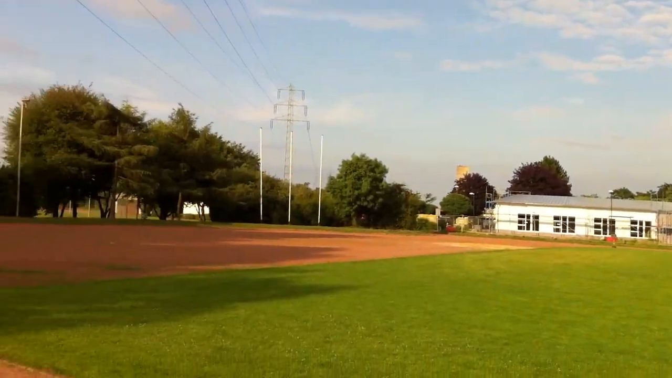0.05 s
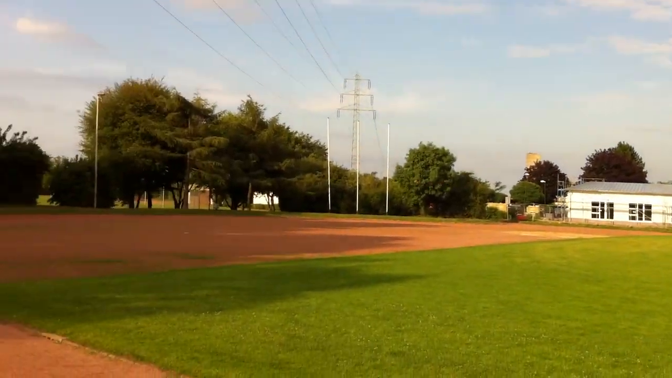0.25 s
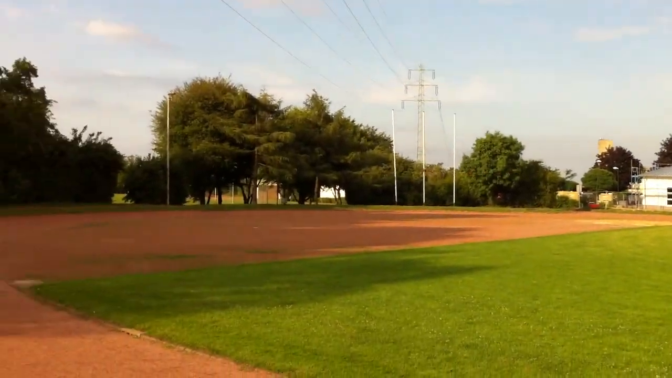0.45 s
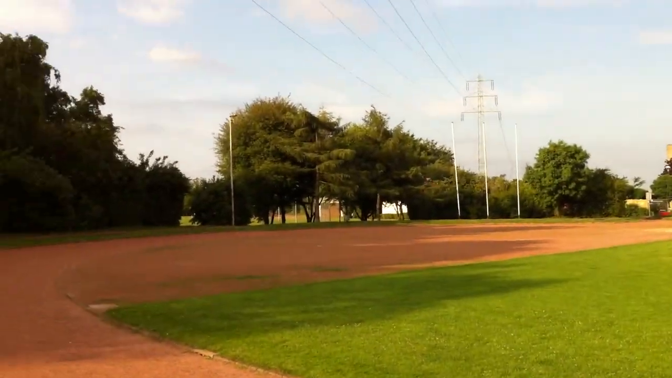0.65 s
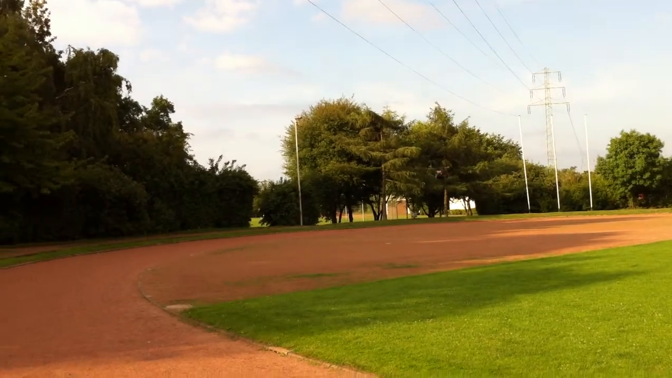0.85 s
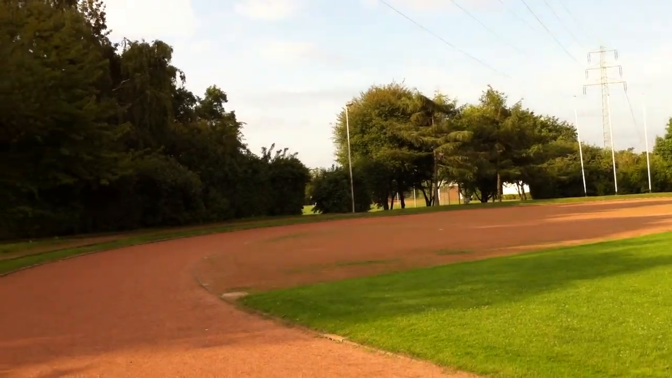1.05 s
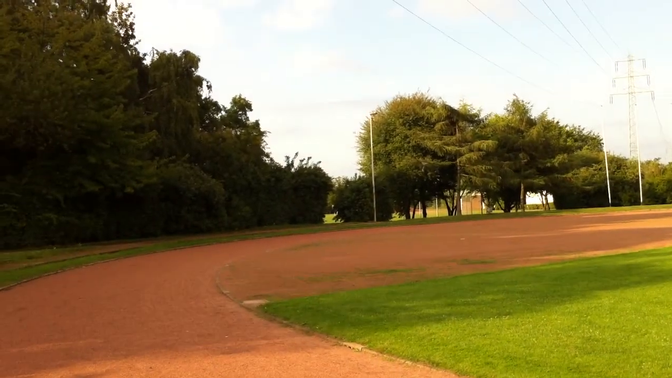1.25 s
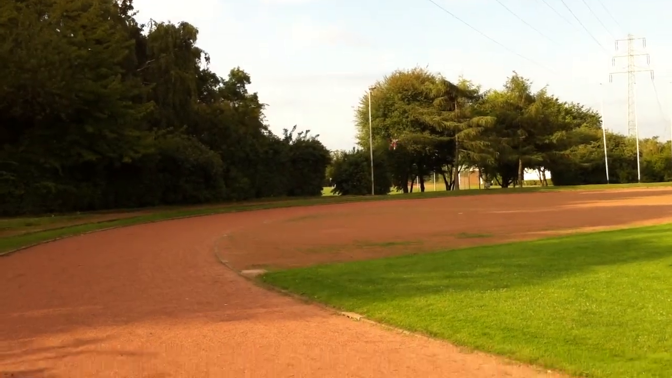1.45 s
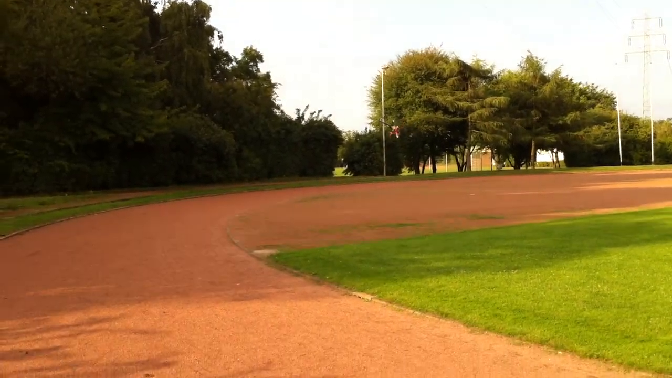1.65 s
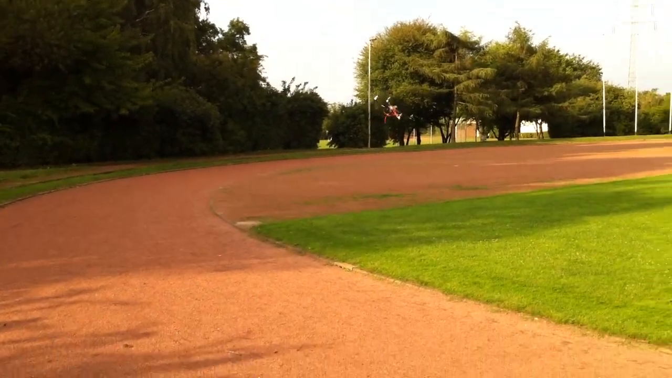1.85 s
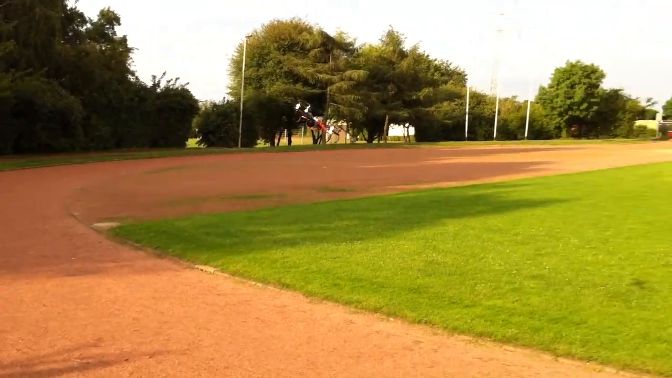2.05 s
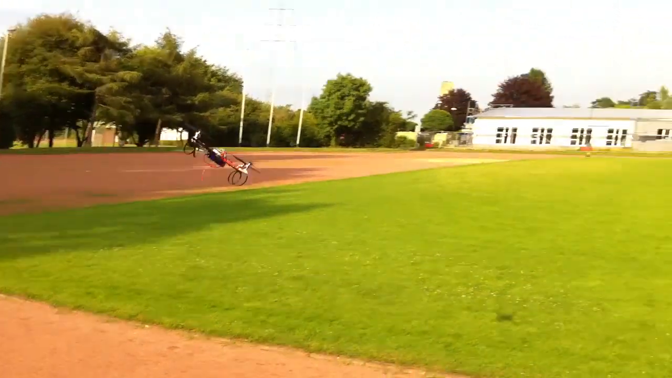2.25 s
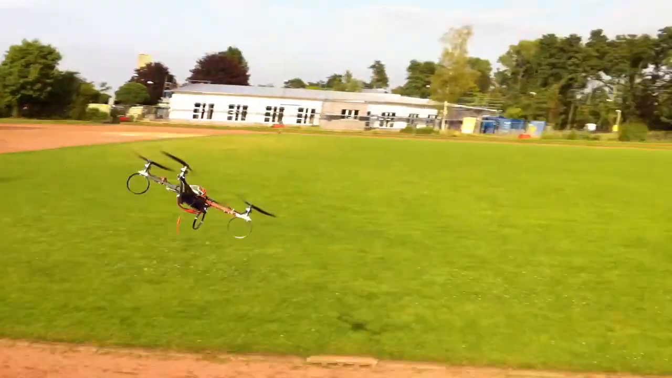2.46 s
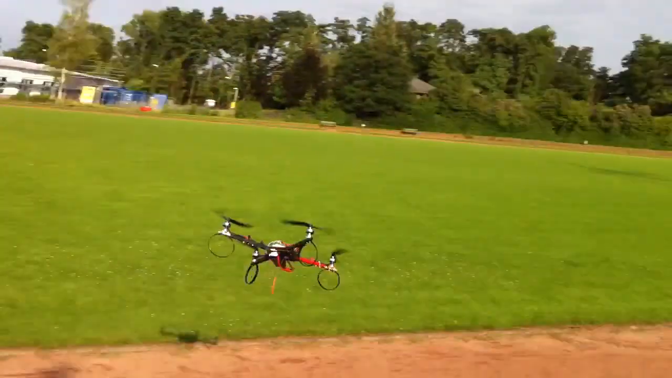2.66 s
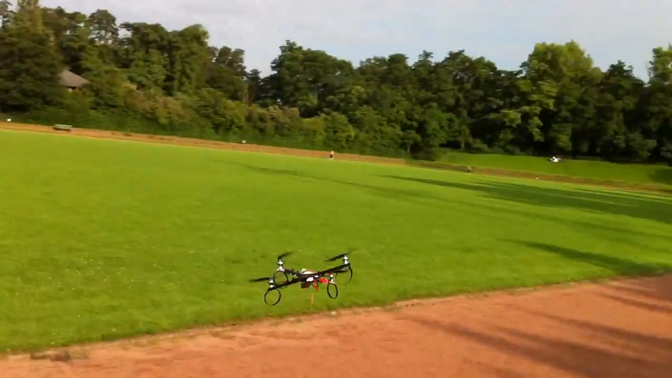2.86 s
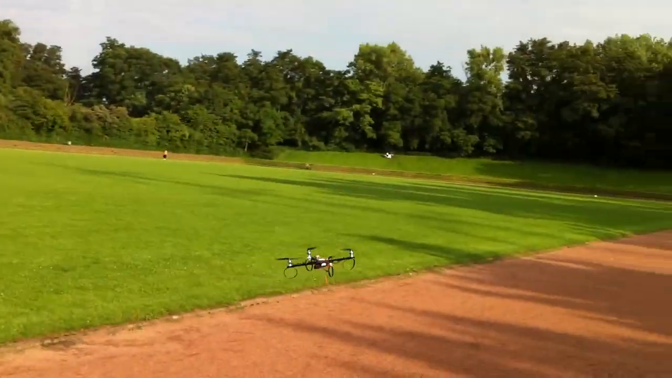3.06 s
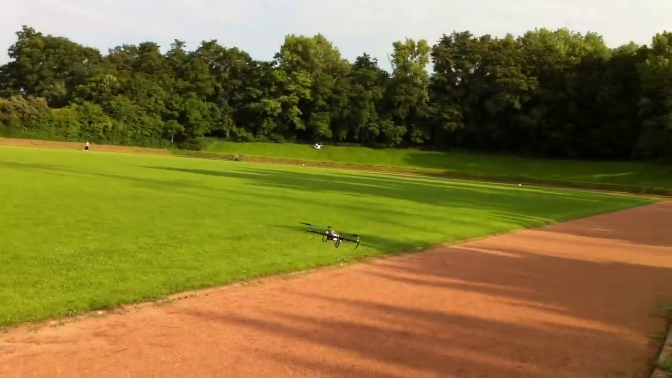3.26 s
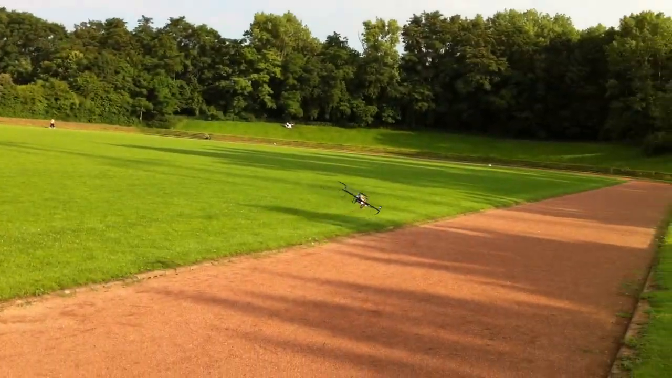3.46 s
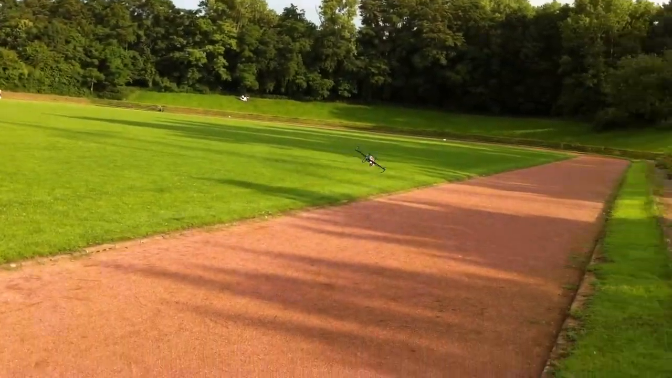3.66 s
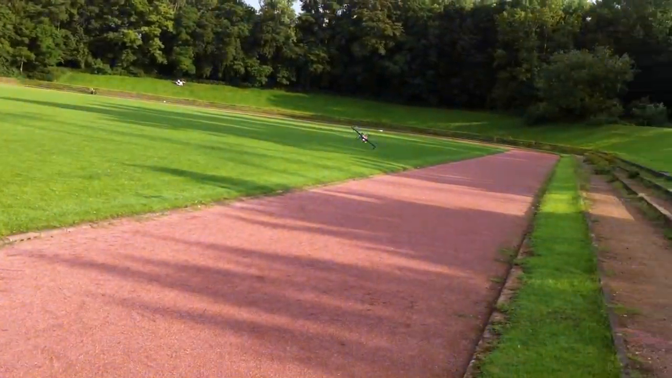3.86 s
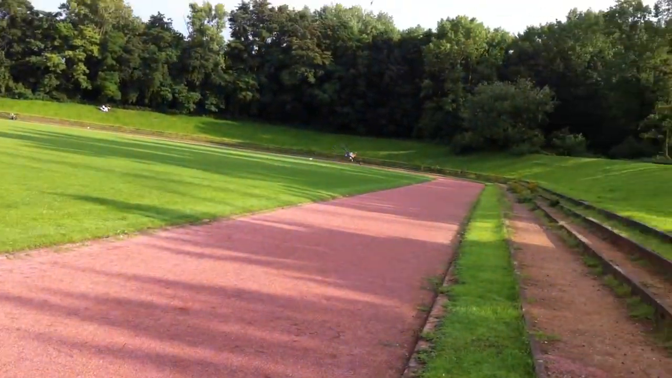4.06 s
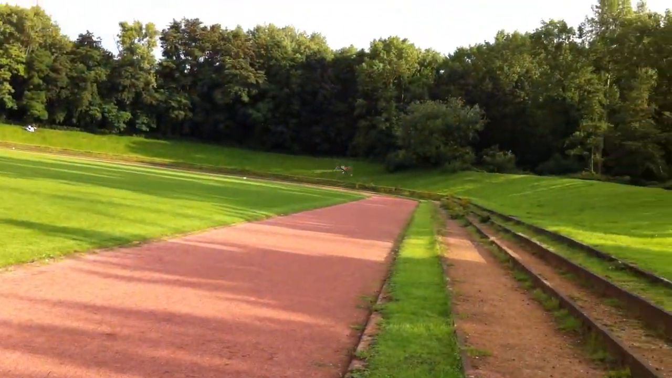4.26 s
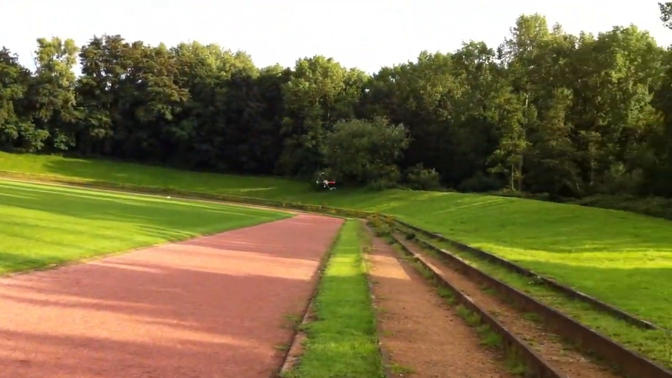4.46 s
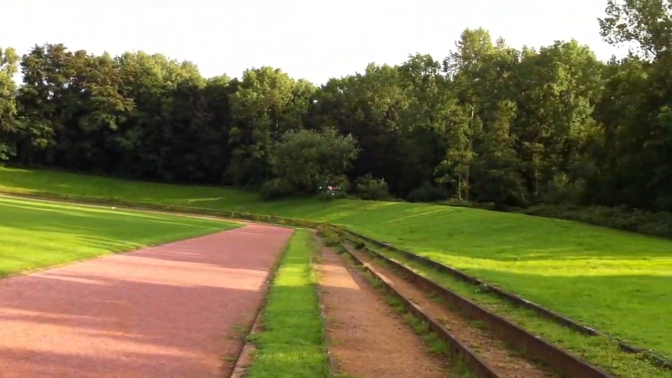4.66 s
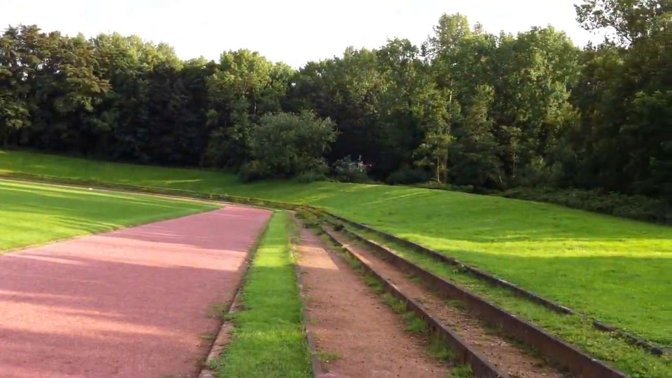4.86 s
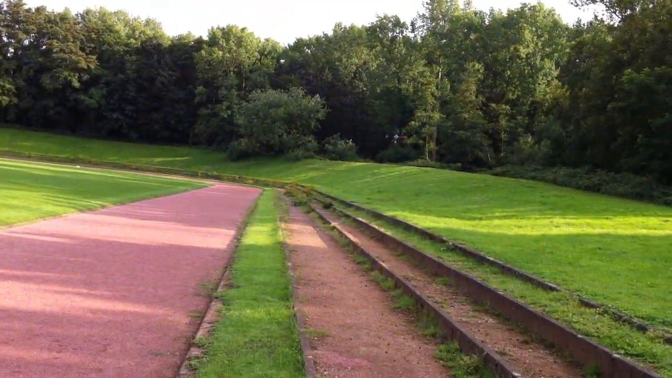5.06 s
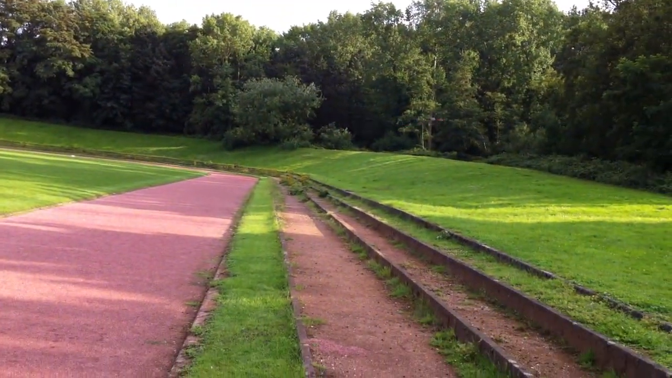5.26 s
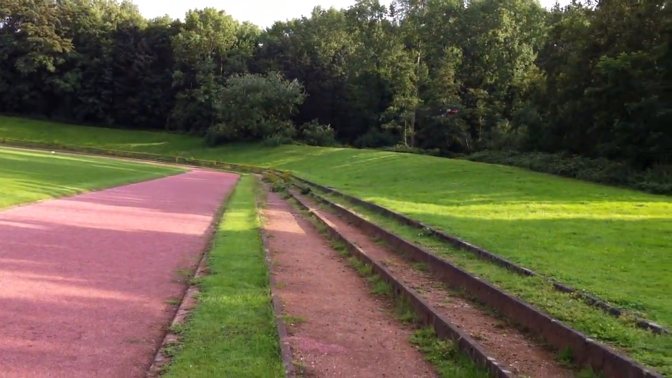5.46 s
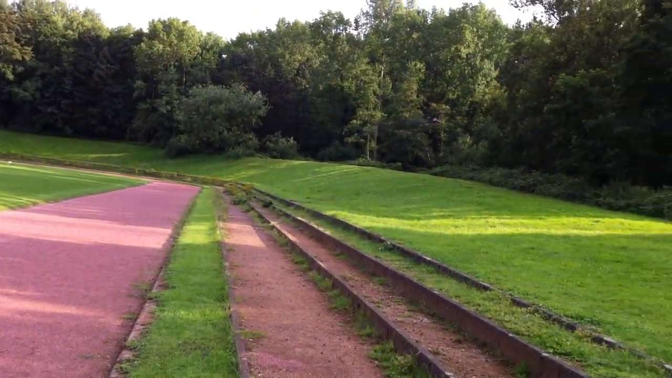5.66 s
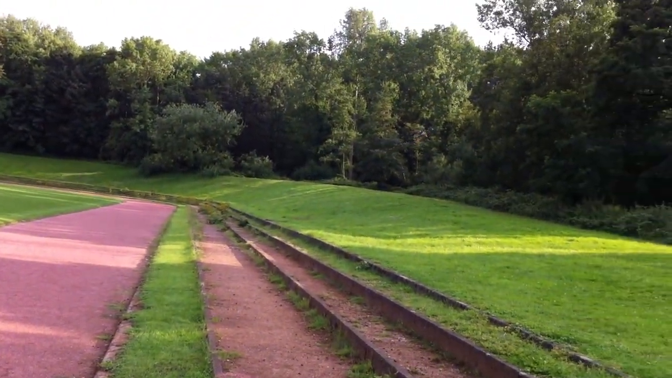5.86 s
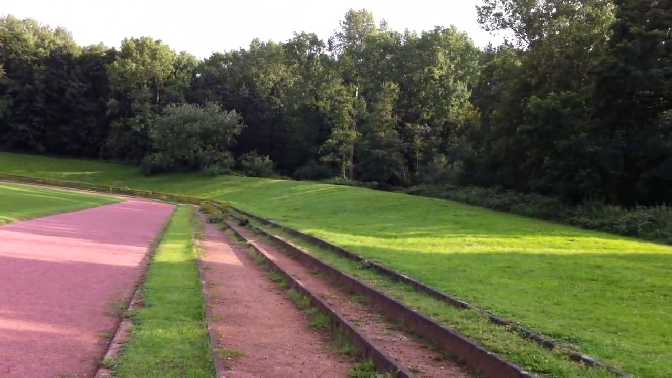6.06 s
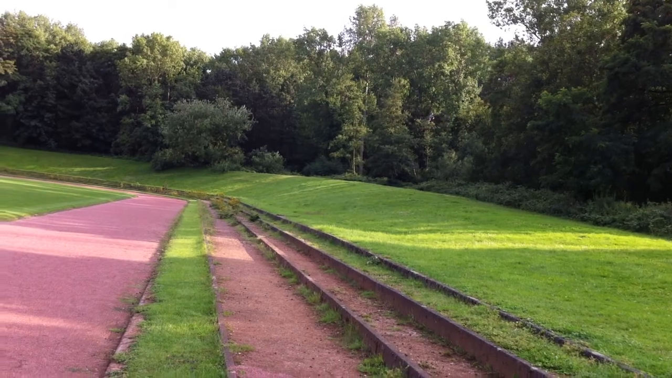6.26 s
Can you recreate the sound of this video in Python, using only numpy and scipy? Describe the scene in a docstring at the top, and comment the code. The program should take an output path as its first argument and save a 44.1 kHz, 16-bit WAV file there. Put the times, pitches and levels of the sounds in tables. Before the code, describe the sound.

Outdoors on an open sports field, a small electric drone is first a faint, restless whine with thin hiss. A bird gives a few short whistles as it approaches. It sweeps close with fluttering blade hum, bright hiss and several clashing motor whines, loudest before the middle, then recedes quickly. Soft wind bumps touch the small handheld microphone while the whine thins away over quiet distant rumble.

```python
"""Far whines and hum of a small four-rotor drone over a sports field; it comes close, passes and fades.
Each motor whines on a high multiple of its restless shaft speed; blades hum in sines and hiss in shaped
noise. The speed controllers sing near 8 kHz, bent by Doppler. A bird whistles in short glides, low wind
pulses and a gust bump the microphone; shaped field noise and a steady thin tone lie beneath."""
import sys
import numpy as np
from scipy import signal
from scipy.io import wavfile
from scipy.ndimage import uniform_filter1d

SR = 44100
rng = np.random.default_rng(int(sys.argv[2]) if len(sys.argv) > 2 else 0)


def unload_audio(sound):
    """Save the sound as a 16-bit wav file, at the path given as the first command line argument."""
    columns = np.transpose(np.atleast_2d(sound))
    # keep every value between -1 and 1, then stretch to whole-number steps
    steps = np.round(np.clip(columns, -1, 1) * 32767)
    wavfile.write(sys.argv[1], SR, steps.astype(np.int16))


N = 278712


def gain_of(db):
    """Decibels to gain."""
    return 10 ** (np.asarray(db) / 20)


def evened(x):
    """Scales to rms 1."""
    return x / np.sqrt(np.mean(x ** 2) + 1e-20)


def read(points, hz):
    """Reads a spectrum on a log frequency axis."""
    f, value = np.transpose(points)
    return np.interp(np.log(hz + 1), np.log(f + 1), value)


def curves(rows, t):
    """Reads every column at the times t."""
    s, *columns = np.transpose(rows)
    return [np.interp(t, s, c) for c in columns]


def step(t, s, width_s):
    """Goes smoothly from 0 to 1 around s seconds."""
    return .5 + .5 * np.tanh((t - s) / width_s)


def add(mix, s, sound):
    """Mixes a sound in at s seconds."""
    part = mix[round(s * SR):][:len(sound)]
    part += sound[:len(part)]


def drift(top_hz):
    """Slow random curve of rms 1: lowpassed noise at a low rate, interpolated."""
    lowpass = signal.butter(2, top_hz, fs=SR / 64, output="sos")
    steps = signal.sosfilt(lowpass, rng.standard_normal(N // 32))
    settled = steps[-(N // 64):]
    return evened(np.interp(np.arange(N) / 64, np.arange(N // 64), settled))


def tone(hz, db):
    """A sine of rms level db that follows the curve hz from a random phase."""
    cycles = np.cumsum(hz) / SR + rng.random()
    return np.sqrt(2) * gain_of(db) * np.sin(2 * np.pi * cycles)


def noise(level_db, patchy_db):
    """Random short-time spectra; level_db(hz, t) shapes them, with drifting patches."""
    frames, hz = N // 256 + 5, np.fft.rfftfreq(1024, 1 / SR)
    real, imag, patches = rng.standard_normal((frames, 513, 3)).T
    patches = uniform_filter1d(patches, size=16, axis=0)
    patches = evened(uniform_filter1d(patches, size=14, axis=1))
    shape_db = level_db(hz[:, None], np.arange(frames) * 256 / SR)
    spectra = (real + 1j * imag) * gain_of(shape_db + patchy_db * patches)
    return signal.istft(spectra, nperseg=1024, noverlap=768)[1][:N]


# Distant traffic and leaves. Each row: frequency in Hz, relative density in dB per Hz.
FIELD_SPECTRUM = [(18, -47), (59, -42), (151, -2.5), (250, -7.5), (389, -12), (1060, -6.5), (1780, -11.5),
                  (3000, -18.5), (3900, -74), (6600, -120)]
# Later colour of the field. Each row: frequency in Hz, change in dB.
FIELD_LATER = [(100, 5), (180, 0.5), (300, -2), (650, -5), (1050, 3.5), (1800, 1), (2600, -14.5)]
FIELD_RMS_DB, COLOUR_SHIFT_S, COLOUR_WIDTH_S = -60, 4.2, 0.68


def field():
    """Distant traffic and leaves as shaped noise whose colour shifts once."""
    def level_db(hz, t):
        shift = step(t, COLOUR_SHIFT_S, COLOUR_WIDTH_S)
        return read(FIELD_SPECTRUM, hz) + read(FIELD_LATER, hz) * shift
    return gain_of(FIELD_RMS_DB) * evened(noise(level_db, patchy_db=1.0))


# Steady high tone. Each row: frequency in Hz, rms level in dB.
THIN_TONES = [(15000, -76)]


def thin_tone():
    """A faint high sine of constant pitch and level."""
    return sum(tone(np.full(N, hz), db) for hz, db in THIN_TONES)


GUST_FROM_S, GUST_TO_S, GUST_DB, GUST_TOP_HZ = 3.5, 5.35, -66, 89


def wind_gust(t):
    """A gust on the microphone: lowpassed noise of lumpy level."""
    lowpass = signal.butter(2, GUST_TOP_HZ, fs=SR, output="sos")
    low = evened(signal.sosfilt(lowpass, rng.standard_normal(N)))
    gate = step(t, GUST_FROM_S, 0.21) - step(t, GUST_TO_S, 0.33)
    return low * gain_of(GUST_DB + 1.9 * drift(6.7)) * gate


# Wind bumps. Each row: start in seconds, relative level in dB, initial pitch in Hz.
WIND_BUMPS = [(3.749, -34, 180), (3.826, -40.5, 170), (4.088, -38, 172), (4.112, -40, 155),
              (4.139, -43, 163), (4.176, -39.5, 125), (4.199, -39, 197), (4.711, -41.5, 152),
              (5.55, -47.5, 123)]


def wind_bumps():
    """Each bump on the microphone is a low push of about two cycles that sags in pitch."""
    out = np.zeros(N)
    for s, db, hz in WIND_BUMPS:
        u = np.arange(2600) / SR * hz  # cycles at the initial pitch
        envelope = u / 0.82 * np.exp(-u / 0.5)
        add(out, s, gain_of(db + 11.5) * envelope * np.sin(2 * np.pi * u / (1 + 0.039 * u)))
    return out


# Bird notes. Each row: start in seconds, length in seconds, start, middle and end pitch in Hz,
# rms level in dB before the rounded envelope.
BIRD_NOTES = [(1.47, .11, 1830, 2030, 1740, -62), (1.86, .15, 2180, 2220, 2270, -64),
              (1.93, .045, 2100, 1850, 1650, -61), (2.155, .05, 1780, 1800, 1820, -61),
              (2.22, .03, 2050, 1900, 1700, -65), (2.26, .04, 1750, 1740, 1750, -62)]


def bird():
    """Short whistles, each gliding along a parabola through three pitches."""
    out = np.zeros(N)
    for s, length_s, *hz, db in BIRD_NOTES:
        u = np.linspace(0, 1, round(length_s * SR))
        glide_hz = np.polyval(np.polyfit([0, .5, 1], hz, 2), u)
        add(out, s, tone(glide_hz, db) * np.sin(np.pi * u) ** 0.26)
    return out


# One table a rotor. Each row: time in seconds, shaft speed as heard in rev/s.
ROTOR_SPEEDS = [
    [(0, 71.9), (.12, 75.3), (.21, 71.6), (.3, 70.2), (.43, 71), (.52, 69.7), (.63, 71), (.73, 68.1),
     (.89, 67.3), (.98, 69), (1.1, 68.3), (1.17, 70.2), (1.27, 66.7), (1.35, 72), (1.47, 69), (1.59, 68.4),
     (1.78, 71.9), (1.87, 77), (1.94, 80), (2.055, 72.6), (2.15, 73.6), (2.28, 66.5), (2.45, 66),
     (2.62, 66.2), (2.7, 70.4), (2.8, 71.5), (2.89, 74.5), (2.96, 79.8), (3, 78.3), (3.06, 74.1),
     (3.15, 79.2), (3.23, 75.8), (3.31, 82.4), (3.36, 81.2), (3.44, 75.6), (3.55, 73.6), (3.64, 78.2),
     (3.76, 80.8), (3.93, 77.4), (4.08, 72), (4.15, 75.8), (4.32, 70.4), (4.42, 75.5), (5.11, 70.6),
     (5.18, 67.6), (5.25, 69.9), (5.35, 65.7), (5.46, 67.6), (5.58, 62.7), (5.72, 67.4), (5.83, 69.8),
     (5.91, 69.5), (5.97, 73.5), (6.08, 73.6), (6.24, 68.3), (6.32, 73.7)],
    [(0, 85.5), (.08, 86), (.26, 92.3), (.56, 90.1), (.63, 84.5), (.8, 82.5), (.97, 83), (1.1, 80),
     (1.24, 85), (1.36, 80), (1.48, 81.5), (1.56, 79.1), (1.71, 79.4), (1.77, 82.3), (1.96, 81.8),
     (2.04, 86.8), (2.18, 75.3), (2.24, 75), (2.32, 71.8), (2.46, 72.6), (2.58, 71), (2.62, 73.8),
     (2.65, 72.8), (2.72, 74.6), (2.8, 72), (2.85, 70.3), (2.89, 68.3), (2.92, 72), (2.98, 69.4),
     (3.03, 70.9), (3.08, 70), (3.26, 58.3), (3.39, 56.8), (3.48, 62.5), (3.57, 66.7), (3.62, 68.2),
     (3.7, 66), (3.79, 67.8), (3.86, 65.8), (3.93, 70), (4.39, 58), (4.46, 62), (4.52, 59.4), (4.6, 55.6),
     (4.67, 63.7), (4.74, 66.8), (4.83, 71.6), (5.68, 60.5), (6.32, 66)],
    [(0, 72.3), (.54, 71.5), (1.4, 67), (1.58, 67.9), (1.68, 65), (1.8, 72), (1.86, 68.9), (2.1, 70),
     (2.2, 66), (2.5, 66), (2.7, 73), (2.95, 71), (3.05, 66), (3.165, 62), (3.2, 66), (3.24, 73),
     (3.27, 74.3), (3.34, 71), (3.41, 73.8), (3.52, 70.9), (3.63, 77.9), (3.7, 79.2), (3.79, 81.6),
     (3.87, 86.2), (3.91, 84.3), (3.99, 86.7), (4.04, 84.4), (4.18, 80.5), (4.28, 83.5), (4.66, 83.9),
     (4.95, 79.4), (5.13, 81.6), (5.27, 80.2), (5.37, 82.4), (5.54, 78.9), (5.79, 83.1), (5.89, 79.6),
     (5.96, 85.1), (6.11, 87.1), (6.21, 81.3), (6.32, 84.2)],
    [(0, 79), (.52, 82.7), (.64, 78), (1.8, 80), (1.98, 85.3), (2.04, 85.8), (2.26, 78.2), (2.48, 77),
     (2.56, 84), (2.7, 88.8), (3.06, 85.2), (3.29, 73.9), (3.42, 76), (3.52, 82), (3.7, 84.3), (3.77, 82),
     (3.97, 79), (4.12, 77.8), (4.24, 79), (4.34, 82), (4.43, 77.9), (4.53, 84.2), (4.68, 83.8),
     (4.8, 78.2), (5.08, 80.6), (5.23, 75.3), (5.5, 77.2), (5.57, 79), (5.72, 77.6), (5.8, 75.3),
     (5.9, 77.1), (6.06, 70.9), (6.2, 78), (6.32, 74.2)],
]


def shaft_speeds(t):
    """Shaft speeds in rev/s; inertia rounds the changes."""
    return [uniform_filter1d(curves(rows, t)[0], size=1100) for rows in ROTOR_SPEEDS]


def blurred(speed):
    """The blade tones blur the quickest wobbles of the shaft."""
    return uniform_filter1d(speed, size=4000)


def blade_beat(speeds):
    """The beat of all blades passing, two a turn on each rotor."""
    return sum(tone(2 * blurred(speed), -10.0) for speed in speeds)


# Craft motion. Each row: time in seconds, speed towards the microphone in m/s.
CLOSING = [(0, 5.8), (.4, 6.9), (1.35, 8.1), (1.9, 9.3), (2.3, 7.8), (2.45, 7), (2.6, 5.1), (2.75, .1),
           (2.88, -2.1), (3.02, -5.7), (3.25, -6.9), (3.7, -7.1), (4.3, -6.1), (4.8, -3.8), (5.4, .1),
           (6.32, 3.9)]
# Controller tone. Each row: time in seconds, relative level in dB.
SWITCHING_LEVEL = [(0, -86), (.4, -64.5), (1, -62), (1.35, -68), (1.9, -56.5), (2.45, -60), (2.6, -46),
                   (2.9, -56), (3.02, -48.5), (3.25, -56), (3.7, -55), (4.3, -57), (4.8, -64.5),
                   (5.5, -64.5), (5.9, -59.5), (6.32, -60)]
SWITCHING_HZ, SOUND_M_PER_S = 8000, 343


def controllers(t, beat):
    """Switching tone, bent by Doppler and fading with the air; the blades give it faint sidebands."""
    closing_m_per_s, db = curves(CLOSING, t) + curves(SWITCHING_LEVEL, t)
    hz = SWITCHING_HZ / (1 - closing_m_per_s / SOUND_M_PER_S)
    hz = hz + 8.8 * drift(26.6)
    db = db - 0.5 + 3.48 * drift(24.4)
    return tone(hz, db) * (1 + 0.19 * beat)


SWELL_S, SWELL_WIDTH_S, SWELL_DB = 1.17, 0.25, 6.5


def swell(t):
    """One soft rise and fall, 0 to 1, of the low rush while the craft is still far."""
    return np.exp(-((t - SWELL_S) / SWELL_WIDTH_S) ** 2)


# Blade levels, also read by blade_tones.
# Each row: time in seconds, relative hiss level in dB, relative blade-pass tone level in dB.
FLIGHT_LEVELS = [(0, -62, -58.5), (.35, -60, -58.5), (.7, -62, -59), (1.1, -58, -55.5), (1.5, -58.5, -61.5),
                 (1.7, -59.5, -66), (1.95, -55.5, -67), (2.1, -54, -54.5), (2.35, -52.5, -55.5),
                 (2.55, -47.5, -48.5), (2.7, -46, -41), (2.82, -46, -44), (2.92, -45.5, -46),
                 (3.05, -49, -48), (3.2, -53.5, -50), (3.45, -57, -55.5), (3.8, -59.5, -52.5),
                 (4.4, -61, -60), (4.7, -56.5, -61.5), (5.1, -60.5, -59), (5.6, -62, -63.5),
                 (6.32, -64, -72)]
# Close echo. Each row: time in seconds, lag in microseconds.
ECHO_LAG = [(0, 199), (1.7, 197), (2.45, 187), (2.9, 196), (4.2, 207), (5.2, 206), (6.32, 233)]
# Hiss far off. Each row: frequency in Hz, relative density in dB per Hz.
FAR_HISS = [(100, 10), (300, -10), (600, 10.5), (1000, 4.5), (1900, 15.5), (2600, 10), (3200, 4.5),
            (4000, 7.5), (6500, 6), (10000, 8), (13000, 3), (15500, -2.5)]
# Hiss close by. Each row: frequency in Hz, relative density in dB per Hz.
NEAR_HISS = [(70, 1), (140, -10), (210, 4), (300, 14), (600, 8.5), (1000, 11.5), (2200, 14), (2800, 7.5),
             (4100, 5), (6500, 9.5), (10000, 6.5), (13000, 8.5), (15500, -2)]
# after the pass the downwash points at the microphone and the low rush grows
PASS_S, TURN_WIDTH_S, RUSH_AHEAD_DB, RUSH_BEHIND_DB = 2.71, 0.13, -4, 2


def hiss(beat):
    """Blade turbulence, combed by a close echo and throbbing as the blades pass."""
    def level_db(hz, t):
        hiss_db = curves(FLIGHT_LEVELS, t)[0]
        near = np.clip((hiss_db + 62) / 14, 0, 1)  # the louder, the closer
        colour_db = (1 - near) * read(FAR_HISS, hz) + near * read(NEAR_HISS, hz)
        rush_db = RUSH_AHEAD_DB + (RUSH_BEHIND_DB - RUSH_AHEAD_DB) * step(t, PASS_S, TURN_WIDTH_S)
        rush_db = rush_db + SWELL_DB * swell(t)
        rush_db = rush_db / (1 + (hz / 2600) ** 4) / (1 + (220 / (hz + 1)) ** 4)
        lag_s = curves(ECHO_LAG, t)[0] * 1e-6
        comb = abs(1 + 0.46 * np.exp(-2j * np.pi * hz * lag_s))
        return hiss_db - 28.5 + colour_db + rush_db + 20 * np.log10(comb)
    return noise(level_db, patchy_db=1.45) * (1 + 0.11 * beat)


BANK_FROM_S, BANK_TO_S, ROUGH_TO_S = 1.974, 3.1, 3.7


def banking(t):
    """Banked turn close by, 0 to 1."""
    return step(t, BANK_FROM_S, 0.095) - step(t, BANK_TO_S, .11)


def rough_air(t):
    """Rough air from the bank onwards, 0 to 1, outlasting the turn."""
    return step(t, BANK_FROM_S, .2) - step(t, ROUGH_TO_S, .2)


# One value a rotor: blade-pass offset in dB.
HUM_OFFSET_DB = [-1, -1, -1, 0]
# One value a rotor: octave offset in dB.
OCTAVE_OFFSET_DB = [0.5, -1, -2, 2.5]
# One value a rotor: rise of its overtones in the swell in dB.
OVERTONE_SWELL_DB = [0, 13, 0, 9]
# Blade overtones. Each row: multiple of shaft speed, level in dB against the hiss curve.
BLADE_OVERTONES = [(6, -20), (8, -24)]
OCTAVE_FAR_DB, OCTAVE_BANKED_DB = -8, 5  # against the hiss curve
FASTER_DB_PER_REV_S = 0.59  # from afar the faster rotors carry better
OVERTONES_BANKED_DB = 1  # the banked blades slap harder


def blade_tones(t, speeds):
    """Two blades a turn hum at twice the shaft speed, with its octave and overtones."""
    hiss_db, pass_db = curves(FLIGHT_LEVELS, t)
    banked = banking(t)
    octave_share = np.maximum(banked, 0.46 * rough_air(t))  # lingers in the rough air
    octave_db = hiss_db + OCTAVE_FAR_DB + (OCTAVE_BANKED_DB - OCTAVE_FAR_DB) * octave_share
    hum = np.zeros(N)
    for speed, hum_db, share_db, swell_db in zip(speeds, HUM_OFFSET_DB, OCTAVE_OFFSET_DB, OVERTONE_SWELL_DB):
        speed = blurred(speed)
        carry_db = FASTER_DB_PER_REV_S * (speed - 76) * (1 - banked)
        hum += tone(2 * speed, pass_db - 10.0 + hum_db + carry_db + 1.9 * drift(7.8))
        hum += tone(4 * speed, octave_db - 14.5 + share_db + 3.3 * drift(17.0))
        lift_db = OVERTONES_BANKED_DB * banked + swell_db * swell(t)
        for multiple, db in BLADE_OVERTONES:
            hum += tone(multiple * speed, hiss_db + db + lift_db + 1.84 * drift(3.2))
    return hum


# One table a rotor, fading as the frame turns.
# Each row: time in seconds, level in dB before the air breaks it.
WHINE_LEVELS = [
    [(0, -62), (.17, -56), (.43, -64), (.5, -73), (.63, -70), (.75, -79.5), (1.05, -63.5), (1.27, -80),
     (1.37, -59), (1.59, -71), (1.8, -52.5), (2.14, -49), (2.22, -52.5), (2.3, -64), (2.38, -63),
     (2.6, -50), (2.74, -49), (2.81, -53), (2.88, -43), (3.04, -55), (3.15, -53.5), (3.23, -59),
     (3.35, -56), (3.5, -67), (3.6, -57), (3.76, -67), (3.9, -59.5), (4.11, -55.5), (4.2, -82), (4.4, -69),
     (4.6, -77), (5.05, -85), (5.15, -70), (5.3, -75), (5.48, -72), (5.64, -78), (5.83, -71), (6.05, -69),
     (6.32, -76)],
    [(0, -66.5), (.54, -71), (.7, -83), (.93, -71), (1.1, -78), (1.22, -71), (1.3, -73), (1.56, -66.5),
     (1.77, -62), (2.46, -52.5), (2.6, -55), (2.63, -55), (2.72, -46.5), (2.89, -53.5), (2.94, -44.5),
     (3.06, -43), (3.11, -68), (3.43, -78), (3.57, -62), (3.7, -76), (3.8, -66), (3.93, -71), (4, -86),
     (4.39, -81), (4.5, -67), (4.57, -86), (4.64, -65), (4.7, -75), (4.76, -64), (4.87, -78), (4.95, -95),
     (6.32, -92)],
    [(0, -87), (1.5, -84), (1.68, -69), (1.8, -67), (1.87, -71), (2.05, -69), (2.2, -77), (3.01, -74),
     (3.06, -57), (3.17, -66), (3.24, -46.5), (3.35, -63), (3.39, -59), (3.52, -57), (3.6, -57),
     (3.74, -53), (3.85, -65.5), (4.66, -63), (5.2, -68), (5.35, -64), (5.42, -82), (5.71, -79),
     (5.79, -72), (5.89, -80), (6.06, -67), (6.14, -84), (6.32, -69)],
    [(0, -88), (.52, -68), (.68, -84), (1.85, -85), (2.04, -62), (2.48, -55.5), (2.58, -58), (2.66, -54),
     (2.73, -54), (3.09, -62), (3.14, -54), (3.25, -70), (3.48, -60), (3.56, -74), (3.73, -69), (4.2, -59),
     (4.33, -51), (4.67, -62.5), (4.8, -66), (5.23, -68), (5.41, -57.5), (5.57, -68.5), (5.9, -61.5),
     (6.05, -68), (6.12, -57), (6.32, -70)],
]
# One value a rotor: rms waver of the whine in calm air in Hz.
CALM_WAVER_HZ = [7, 11, 12, 9]
WHINE_ORDER = 48  # multiple of shaft speed
FRAY_FROM_REV_S, FRAY_HZ_PER_REV_S = 84, 8
WAVER_ROUGH, FADING, SCATTER = 0.7, .24, .42  # extra share of waver, shares of fading and scatter


def motor_whines(t, speeds):
    """Each motor sings on a multiple of shaft speed; moving air breaks and scatters it."""
    rough = rough_air(t)
    whines = np.zeros(N)
    for speed, levels, waver_hz in zip(speeds, WHINE_LEVELS, CALM_WAVER_HZ):
        whine_db = uniform_filter1d(curves(levels, t)[0], size=1100)
        waver = waver_hz * (1 + WAVER_ROUGH * rough) * drift(30.0)
        fray = FRAY_HZ_PER_REV_S * np.maximum(speed - FRAY_FROM_REV_S, 0) * drift(60)
        whine = tone(WHINE_ORDER * speed + waver + fray, whine_db)
        air = FADING * drift(20) + SCATTER * rough * drift(250)
        whines += whine * (1 + tone(speed, -18) + air)  # once-a-turn sidebands
    return whines


def scene():
    """Everything reaches one microphone, on two equal channels."""
    t = np.arange(N) / SR
    speeds = shaft_speeds(t)
    beat = blade_beat(speeds)
    background = field() + thin_tone() + wind_gust(t) + wind_bumps() + bird()
    drone = controllers(t, beat) + hiss(beat) + blade_tones(t, speeds) + motor_whines(t, speeds)
    return np.tile(background + drone, (2, 1))


EDGE_HZ = 15650


def record(dry):
    """The small microphone drops the deep bass; then a steep lowpass ends the treble."""
    thin = signal.sosfilt(signal.butter(3, 95., "high", fs=SR, output="sos"), dry)
    edge = signal.firwin(1023, EDGE_HZ, window=("kaiser", 9), fs=SR)
    return signal.oaconvolve(thin, edge[None], "same")


dry = scene()
out = record(dry)
unload_audio(out)
```